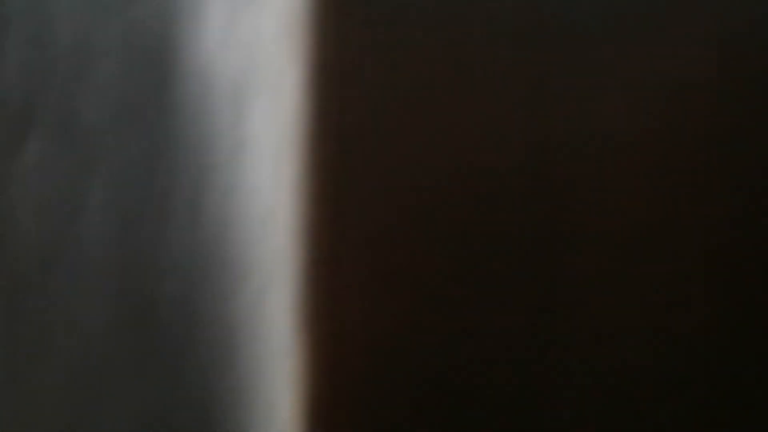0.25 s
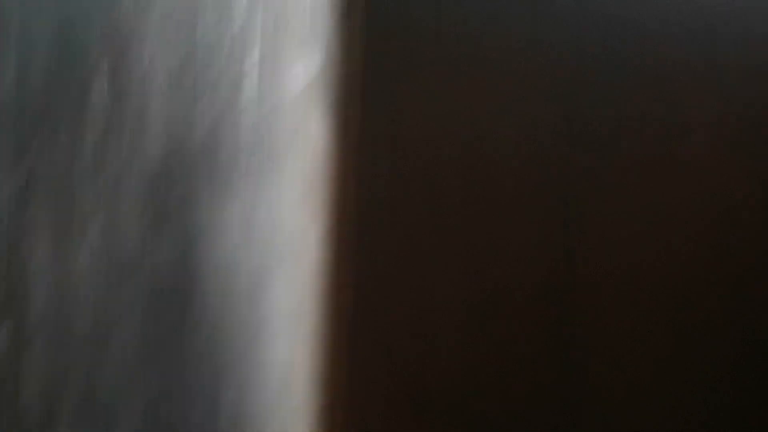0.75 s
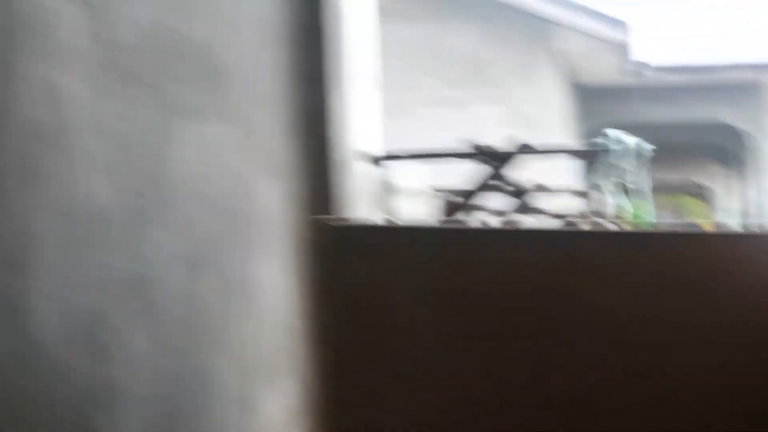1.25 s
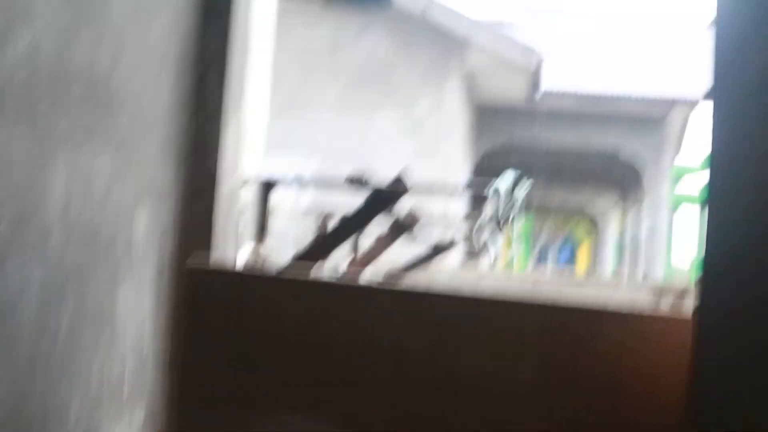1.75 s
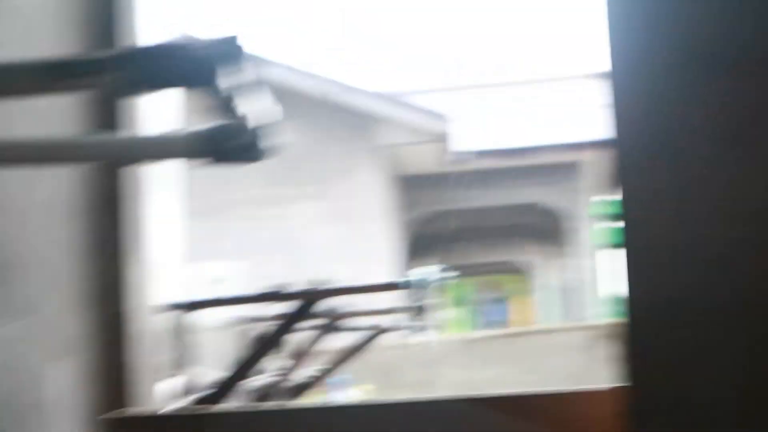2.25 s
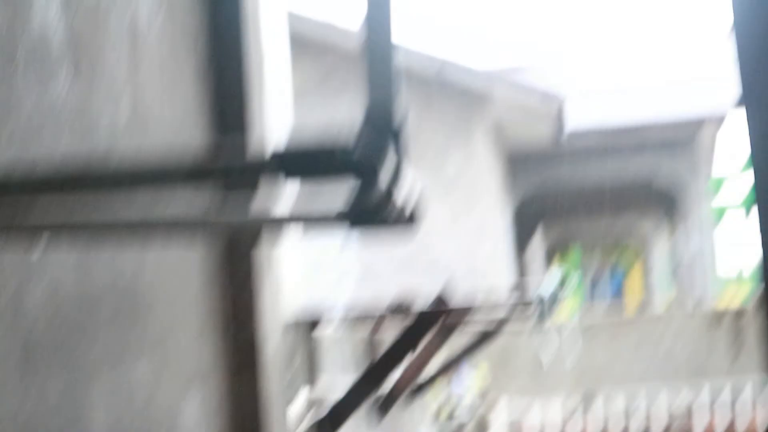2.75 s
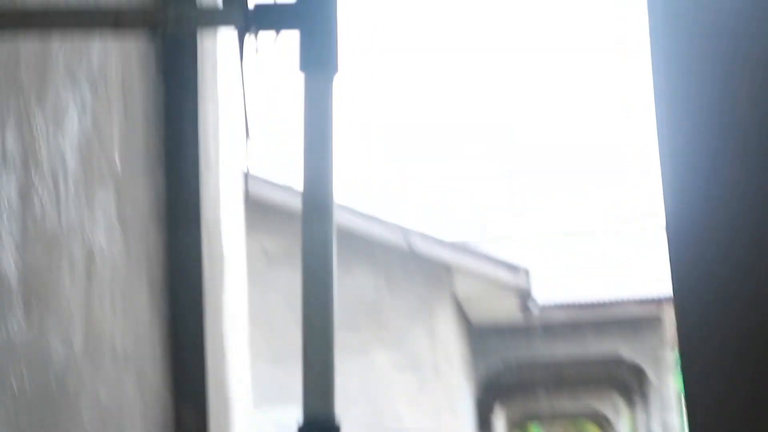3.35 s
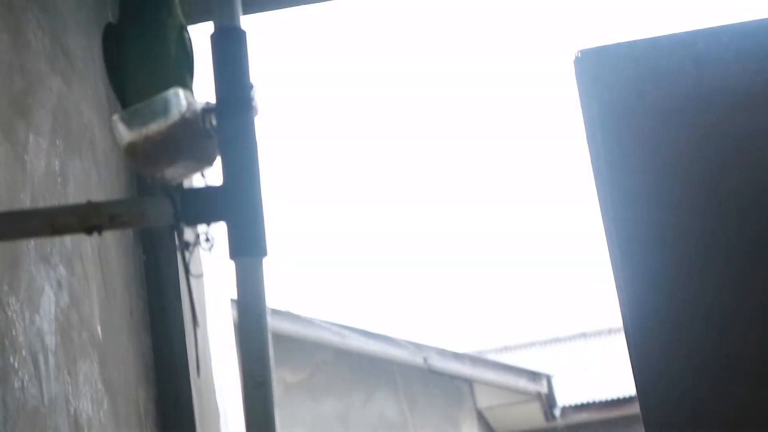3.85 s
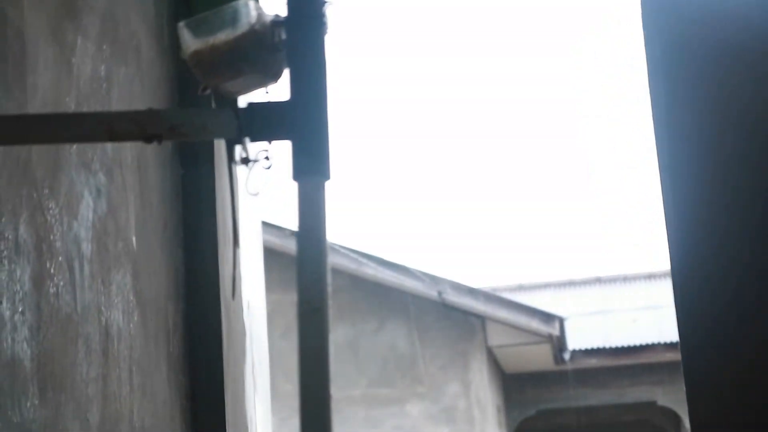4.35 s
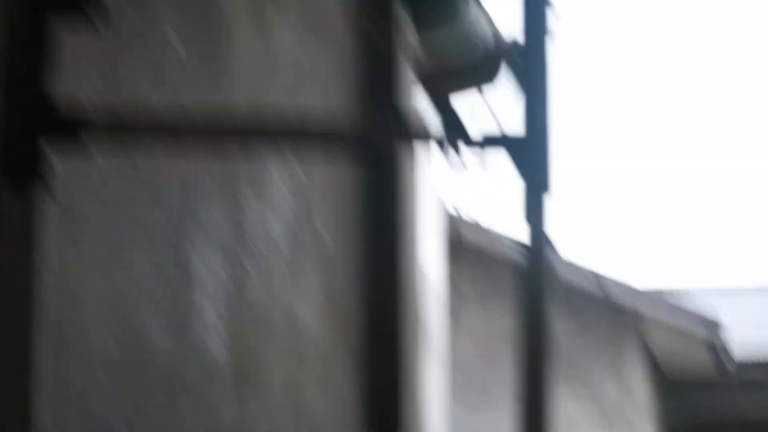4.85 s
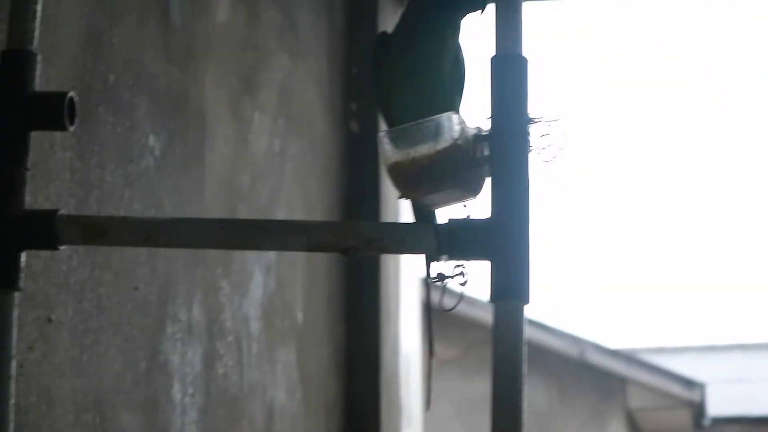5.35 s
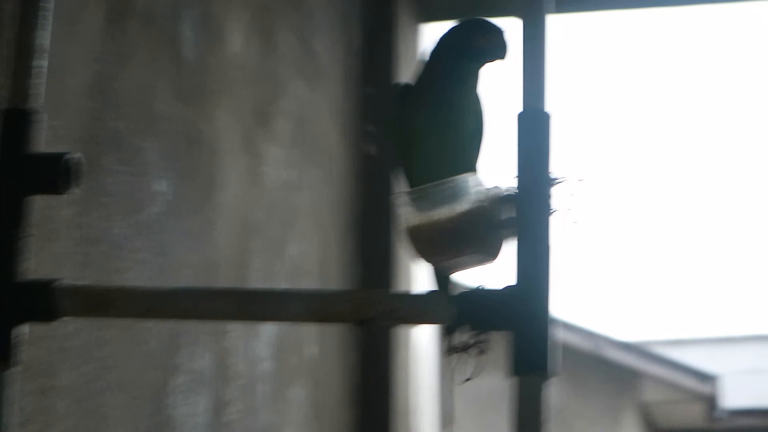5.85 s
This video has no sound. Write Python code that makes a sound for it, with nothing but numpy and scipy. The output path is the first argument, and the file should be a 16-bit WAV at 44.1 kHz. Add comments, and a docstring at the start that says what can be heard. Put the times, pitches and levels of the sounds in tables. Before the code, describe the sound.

Five short raspy parakeet screeches, spaced unevenly and each breaking downward, ring briefly off bare walls above a low outdoor rush and tiny ticks.

```python
"""A low rustle over outdoor rush, then a parakeet squawks five times in a small bare room.
Squawk: a buzz of partials plus rasping air, shaped by throat and beak; it scoops up out of a rasp,
holds a bright pitch, then breaks down to a lower, harsher ending. Noise tails make the room.
Ticks are noise bursts in one resonance each. Through the open window: rush of filtered noise and
distant engines, each a gliding unsteady sine. Two faint far chirps are narrow patches of noise."""
import sys
import numpy as np
from scipy import signal
from scipy.fft import rfft, irfft, next_fast_len
from scipy.io import wavfile
from scipy.ndimage import map_coordinates

SR = 44100
rng = np.random.default_rng(int(sys.argv[2]) if len(sys.argv) > 2 else 0)


def log_audio(samples):
    """Write samples as a 16-bit WAV file to the path given in sys.argv[1]."""
    # one column per channel
    frames = np.atleast_2d(samples).T
    # limit to full scale, then quantise
    limited = np.clip(frames, -1, 1)
    pcm = np.round(limited * 32767).astype(np.int16)
    wavfile.write(sys.argv[1], SR, pcm)


N = 268304

# Levels in the tables are before the output filter.
# Squawks: start/s, attack/s, break time/s, length/s, held pitch/Hz, drift/(Hz/s), sway/Hz, ending pitch/Hz,
# level/dB, ending against hold/dB, beak opening (gain of each of 4 formants/dB, brightness/(dB/octave))
SQUAWKS = [(.113, 0.02, .141, 0.24, 1045, 262, -8, 853, -18.5, -3.5, (5, -1, 1, 3.5, -0.93)),
           (.638, .029, 0.15, 0.23, 989.3, -270, 7.5, 828, -17.5, -6, (6, -.5, 4, 6, 0.16)),
           (1.092, 0.03, 0.15, .24, 955.6, -92, 10.5, 823.7, -20, -3, (-1, -4.5, -1, 6, -1.7)),
           (1.731, 0.032, .151, 0.22, 931.8, -50, 3, 818.5, -16.5, -6, (6, 2.5, 0, 1, 1.3)),
           (2.928, 0.019, 0.16, 0.22, 880.2, -150, 12, 786, -18.5, -0.5, (7, 1, -1, 2.5, 0.8))]
# Steady throat response: f/Hz, gain/dB
THROAT_RESPONSE = [(410, -22.5), (700, -10), (1020, -14.5), (1360, -11.5), (1830, -1), (2160, -9),
                   (2770, -2), (3400, 3.5), (4130, -1), (5710, -7.5), (7700, -17.5), (8760, -16.5),
                   (10200, -23), (13400, -39.5), (15500, -55)]
# Steady beak peaks and notches: f/Hz, 1/e half width/Hz, gain/dB
BEAK_PEAKS = [(2435, 242, 7), (3910, 2900, 2), (2340, 83, 2.5), (3366, 206, -6)]
# Resonances that open and close with the beak: f/Hz, 1/e half width/Hz
BEAK_FORMANTS = [(950, 310), (1900, 820), (3900, 500), (5800, 720)]
# Reverberation time of the room: f/Hz, t60/s
ROOM_T60 = [(300, 0.65), (1000, 0.4), (2500, 0.43), (5000, 0.4), (12000, 0.31)]
# Light ticks: t/s, peak level/dB, ring f/Hz, t60 of the noise burst/s
TICKS = [(1.628, -36, 3710, 0.01), (2.171, -36.5, 1140, 0.043), (2.171, -37.5, 2670, 0.011),
         (4.01, -39.5, 2930, 0.018), (4.524, -35.5, 3530, 0.017), (4.811, -32, 3450, 0.016),
         (4.904, -40, 3000, 0.011)]
# Course of the rush level, before its common lift: t/s, relative level/dB
RUSH_LEVEL = [(0.0, -43.5), (0.25, -49.5), (0.39, -49.5), (0.78, -52), (0.91, -55.5), (1.79, -50),
              (2.15, -51.5), (2.95, -45), (6.08, -44.5)]
# Rush spectrum: f/Hz, relative density/dB
RUSH_SPECTRUM = [(18, -80), (30, -45), (108, -19), (164, -17), (202, -12), (270, -12), (479, -3.5),
                 (747, -2), (852, -2.5), (1050, -5), (2130, -6), (3590, -16), (8950, -33), (13600, -50),
                 (15500, -63)]
# Left-right likeness of the rush: f/Hz, correlation/1
RUSH_LIKENESS = [(40, .5), (110, 1), (450, 0.65), (900, 1), (2000, 0.41), (10000, 0.2)]
# Distant engines: loudest t/s, 1/e half length/s, firing f/Hz, glide/(Hz/s), level/dB
ENGINES = [(0.505, 0.26, 147, -6.5, -67.5), (1.396, 0.35, 165.5, -10.5, -73.5),
           (2.591, 0.48, 151, -17.5, -65.5), (5.005, 0.44, 120, 0.5, -59), (5.1, 0.5, 80, 0, -71),
           (5.87, 0.46, 145.4, -9.5, -54.5), (6.05, .18, 123.5, -1.5, -56)]
# Phase by which street sound leads on the right: f/Hz, lead/rad
STREET_LEAD = [(60, 1.5), (170, 0.3), (450, 1.04), (1500, 1.59), (3000, 4), (10000, -3.5)]
# Sideways shift of the street sound: t/s, share of full shift/1
STREET_SHIFT = [(.7, 1), (1, 0), (4.1, 0), (4.85, 1)]
# Faint far chirps: t/s, f/Hz, level/dB
CHIRPS = [(2.672, 4850, -56), (6.06, 4830, -62)]
# Output balance: f/Hz, left minus right/dB
LEFT_MINUS_RIGHT = [(60, -3), (130, 2.5), (290, 0), (640, -5.5), (1410, -10), (3100, -9.0), (6820, -7),
                    (15000, -8.5)]

TOP_HZ = 15760
SCOOP_SHARE, SCOOP_S = 0.2, 0.0145  # starts this share under pitch; time constant of closing the gap
SWAY_LOW_S, SWAY_PERIOD_S = 0.0962, 0.0858  # held pitch arches, dips and lifts again (positive sway)
BREAK_S = 0.01604  # half the time the pitch drop takes
PUSH_DB, PUSH_S = 2.5, 0.017  # push that tops the attack, 1/e half length
FADE_DB_PER_S, RELEASE_S = 42, 0.017  # fade after the break; gate closing time
UNEVEN_DB, UNEVEN_PER_S = 1.6, 45.1  # the bird's effort is never quite steady
ONSET_ROUGH, ONSET_S = 1.11, 0.025
HOLD_ROUGH, ENDING_ROUGH, ROUGH_PER_S = 0.076, 0.49, 2.5


def amp(db):
    """Decibels to amplitude ratio."""
    return 10 ** (np.asarray(db) / 20)


def unit(x):
    """Scale to an RMS of 1."""
    return x / np.sqrt(np.mean(x ** 2) + 1e-20)


def along(points, hz):
    """Interpolate (Hz, value) points on a log-frequency axis."""
    f, v = np.transpose(points)
    return np.interp(np.log(hz + 1), np.log(f + 1), v)


def curves(rows, t):
    """Columns after the time, interpolated at the times t."""
    s, *cols = np.transpose(rows)
    return [np.interp(t, s, c) for c in cols]


def wobble(rate, size):
    """Smooth random curve, rate knots a second."""
    return map_coordinates(rng.standard_normal(size), [np.arange(size) * rate / SR], mode="mirror")


def bell(x, centre, width):
    """Gaussian hump of height 1; width is the 1/e half width."""
    return np.exp(-((x - centre) / width) ** 2)


def filtered(x, response):
    """Multiply the spectrum of x by a response of frequency."""
    size = x.shape[-1]
    m = next_fast_len(size + 8192)
    return irfft(rfft(x, m) * response(np.fft.rfftfreq(m, 1 / SR)), m)[..., :size]


def cycles(hz):
    """Running phase of a tone, in radians."""
    return 2 * np.pi * np.cumsum(hz) / SR


def causal(gain):
    """Minimum-phase response with this gain: it rings only after its input."""
    cepstrum = irfft(np.log(gain))
    half = cepstrum.shape[-1] // 2
    fold = np.r_[1, np.full(half - 1, 2), 1, np.zeros(half - 1)]
    return np.exp(rfft(cepstrum * fold))


def parakeet(level_db=0):
    """Five squawks, each ringing in the room through its own randomly drawn echoes."""
    return amp(level_db) * sum(room(squawk(start, shape, gape)) for start, *shape, gape in SQUAWKS)


def squawk(start_s, shape, gape, jitter=0.037, shimmer_db=3, rasp=0.54, quiver=0.005, hollow_db=-7):
    """The syrinx buzzes through the tract; when rough, its cycles scatter and air rasps once a cycle."""
    t = np.arange(SR // 3) / SR
    pitch_hz, gain, rough = effort(t, *shape)
    rough = np.clip(rough, 0, 1) ** 1.8
    scatter = jitter * rough * wobble(650, len(t)) + quiver * wobble(128.3, len(t))
    phase = cycles(pitch_hz * (1 + scatter))
    k = np.arange(1, 19)[:, None]  # partial numbers
    # as the pitch sags the slack membranes swing more evenly, which weakens the even partials
    slack = np.clip((1 - pitch_hz / pitch_hz.max()) / 0.12, 0, 1)
    swell_db = 2 * np.array([wobble(55, len(t)) for _ in k])  # each partial on its own
    partials = tract(k * pitch_hz, gape) * amp(hollow_db * slack * (k % 2 == 0) + swell_db)
    buzz = (partials * np.sin(k * phase + rng.uniform(0, 2 * np.pi, k.shape))).sum(0)
    buzz = buzz / np.sqrt((partials ** 2).sum(0) / 2)
    puffs = rng.standard_normal(len(t)) * (1 + np.cos(phase))
    air = unit(filtered(puffs, lambda hz: tract(hz, gape)))
    shimmer = amp(shimmer_db * rough * wobble(500, len(t)))
    voice = gain * shimmer * (buzz + rasp * rough * air)
    return np.pad(voice, (round(start_s * SR), N))[:N]


def effort(t, attack_s, break_s, length_s, held_hz, drift, sway_hz, ending_hz, level_db, ending_db):
    """Pitch, gain and roughness of a squawk: scoop, swaying hold, break, fading harsh ending."""
    broken = (1 + np.tanh((t - break_s) / BREAK_S)) / 2
    after_s = np.maximum(t - break_s, 0)
    sway = sway_hz * np.cos(2 * np.pi * (t - SWAY_LOW_S) / SWAY_PERIOD_S)
    held = held_hz + drift * (t - break_s / 2) - sway
    pitch_hz = (held + broken * (ending_hz - held)) * (1 - SCOOP_SHARE * np.exp(-t / SCOOP_S))
    gate = np.clip(t / attack_s, 0, 1) * np.clip((length_s - t) / RELEASE_S + 0.5, 0, 1)
    db = level_db + PUSH_DB * bell(t, attack_s, PUSH_S) + ending_db * broken - FADE_DB_PER_S * after_s
    db = db + UNEVEN_DB * wobble(UNEVEN_PER_S, len(t))
    rough = HOLD_ROUGH + ONSET_ROUGH * bell(t, 0, ONSET_S)
    rough = rough + ENDING_ROUGH * broken + ROUGH_PER_S * after_s
    return pitch_hz, gate * amp(db), rough


def tract(hz, gape, cut_hz=550):
    """Gain of throat and beak for one opening of the beak; so small a beak radiates no bass."""
    *strengths_db, bright_db = gape
    steady = along(THROAT_RESPONSE, hz)
    steady = steady + sum(db * bell(hz, centre, width) for centre, width, db in BEAK_PEAKS)
    opened = sum(db * bell(hz, centre, width)
                 for db, (centre, width) in zip(strengths_db, BEAK_FORMANTS))
    tilt = bright_db * np.log2((hz + 1) / 3000)
    return amp(steady + opened + tilt) * np.minimum(hz / cut_hz, 1) ** 2


def room(x, wet_db=-5, early_db=-3, early_t60_s=0.06, lag_s=0.00013, turn_rad=0.25, evenness=0.38, size=32768):
    """The voice reaches the left late; near walls smear it at once and the bare room rings on behind."""
    hz, t, z = signal.stft(rng.standard_normal((2, 2, SR // 2)), SR, nperseg=256)
    late = signal.istft(z[0] * amp(-60 * t / along(ROOM_T60, hz)[:, None]), SR, nperseg=256)[1]
    early = signal.istft(z[1] * amp(-60 * t / early_t60_s), SR, nperseg=256)[1]

    def response(tail):
        tail = tail / np.linalg.norm(tail[0])
        return rfft(np.pad(tail, ((0, 0), (SR // 300, 0))), size)

    half_phase = np.pi * np.fft.rfftfreq(size, 1 / SR) * lag_s + turn_rad / 2
    direct = np.exp(1j * half_phase * np.array([[-1], [1]]))
    near = direct + amp(early_db) * response(early)
    # near echoes scramble phase more than level
    near = near * causal((np.abs(near) + 0.14) ** -evenness)
    lead = size // 256  # samples of room for the side that hears first
    answer = np.roll(irfft(near + amp(wet_db) * response(late)), lead, axis=1)
    return signal.fftconvolve(x[None], answer, axes=1)[:, lead:lead + N]


def rustle(level_db=-48, end_s=0.202, fade_s=0.045, opposed=0.31):
    """Soft low filtered noise at the start, opposite in sign and weaker on the left."""
    colour = [(20, -27), (60, -8), (150, 9), (400, -6), (900, -28), (3000, -60)]  # f/Hz, gain/dB
    noise = unit(filtered(rng.standard_normal(N), lambda hz: amp(along(colour, hz))))
    fade = np.clip((end_s - np.arange(N) / SR) / fade_s + 1, 0, 1)
    return amp(level_db) * noise * fade * np.array([[-opposed], [1]])


def ticks(width=0.3):
    """Each light contact is a short decaying noise burst in one resonance."""
    out, t = np.zeros(N + SR), np.arange(SR // 10) / SR
    for s, db, ring_hz, t60_s in TICKS:
        burst = amp(-60 * t / t60_s) * rng.standard_normal(len(t))
        # 1 ms in, as the zero-phase filter also rings ahead
        ring = filtered(np.roll(burst, SR // 1000), lambda hz: bell(hz, ring_hz, width * ring_hz))
        out[round(s * SR):][:len(t)] += amp(db) * ring / np.abs(ring).max()
    return out[:N]


def window(x, shift_rad=0.57, shift_db=6, centre_hz=600, octaves=1.0):
    """Phase places street sound sideways; early and late its middle range moves further right."""
    hz, t, z = signal.stft(x, SR, nperseg=1024)
    middle = bell(np.log2(hz + 1), np.log2(centre_hz), octaves)[:, None]
    shift = middle * curves(STREET_SHIFT, t)[0]
    side = np.array([-0.5, 0.5])[:, None, None]
    lead = along(STREET_LEAD, hz)[:, None] + shift_rad * shift
    z = z * np.exp(1j * side * lead) * amp(side * shift_db * shift)
    return signal.istft(z, SR, nperseg=1024)[1][:, :N]


def outdoors(lift_db=4, swell_db=0.9, flutter_db=1.0):
    """Broad street rush: mid and side noise mixed per frequency to a set left-right likeness."""
    def mid_side_gains(hz):
        turn = np.arccos(np.clip(along(RUSH_LIKENESS, hz), -1, 1)) / 2
        return amp(along(RUSH_SPECTRUM, hz)) * [np.cos(turn), np.sin(turn)]

    mid, side = filtered(rng.standard_normal((2, N)), mid_side_gains)
    db, = curves(RUSH_LEVEL, np.arange(N) / SR)
    db = db + lift_db + swell_db * wobble(8.0, N) + flutter_db * wobble(30, N)
    return unit(np.array([mid + side, mid - side])) * amp(db)


def engines(waver=0.012, flutter_db=1.2):
    """Each engine is one unsteady low line that glides as it swells and fades."""
    t = np.arange(N) / SR

    def line(hz):
        return unit(np.sin(cycles(hz * (1 + waver * wobble(12, N)))))

    drone = sum(amp(db) * bell(t, s, half_s) * line(hz + glide * (t - s))
                for s, half_s, hz, glide, db in ENGINES)
    return drone * amp(flutter_db * wobble(2.9, N))


def chirps(width_hz=380, half_s=0.027):
    """Small bird far off; distance blurs each chirp into a narrow patch of noise."""
    t = np.arange(N) / SR

    def patch(centre_hz):
        return unit(filtered(rng.standard_normal(N), lambda hz: bell(hz, centre_hz, width_hz)))

    return sum(amp(db) * bell(t, s, half_s) * patch(hz) for s, hz, db in CHIRPS)


def scene():
    """Bird in the room, rustle and ticks, street through the window, far chirps."""
    return parakeet() + rustle() + ticks() + window(outdoors() + engines()) + chirps()


def record(dry):
    """Output filter: left duller than right, 1.5 dB trim, nothing above the band limit."""
    def response(hz):
        balance_db = along(LEFT_MINUS_RIGHT, hz) * np.array([[0.5], [-0.5]])
        return amp(balance_db - 1.5) * (hz < TOP_HZ)

    return filtered(dry, response)


dry = scene()
out = record(dry)
log_audio(out)
```